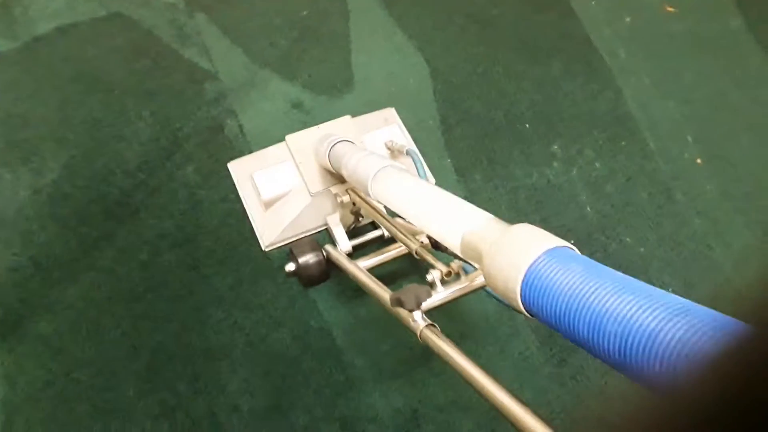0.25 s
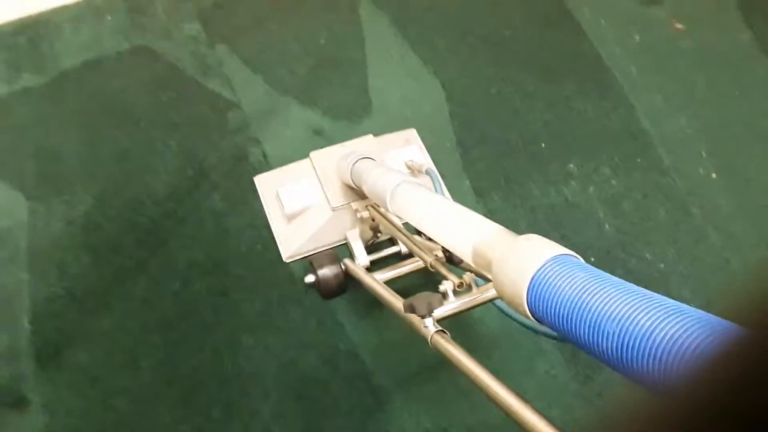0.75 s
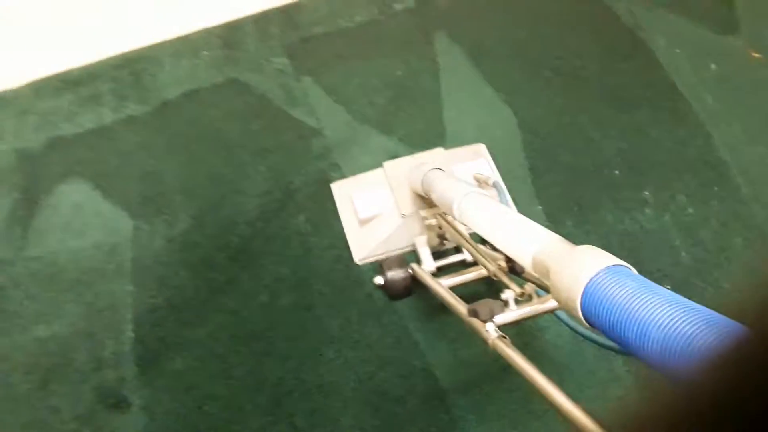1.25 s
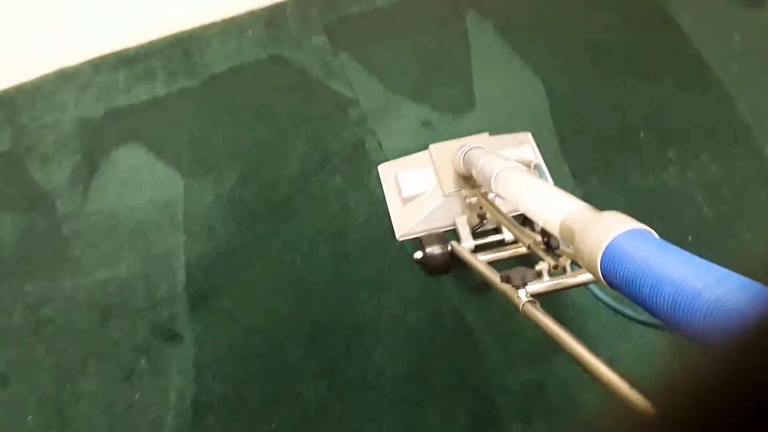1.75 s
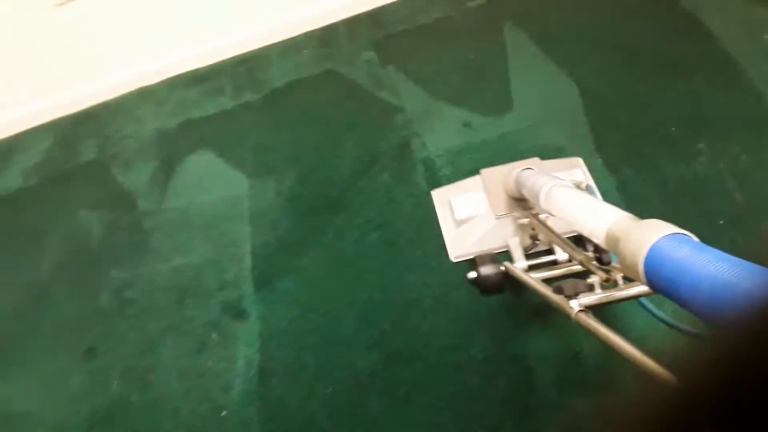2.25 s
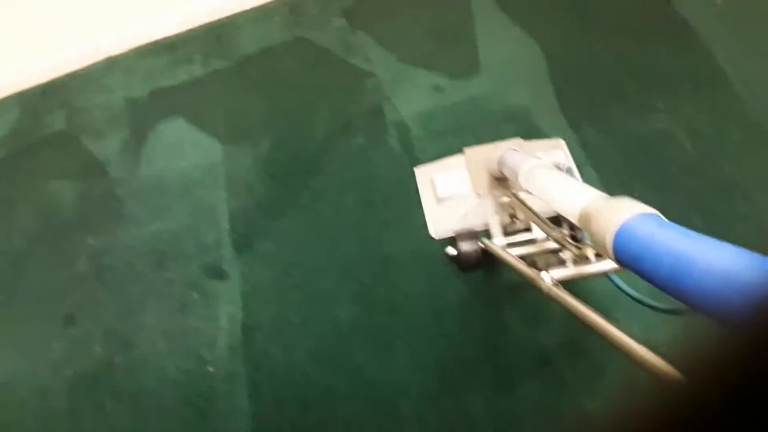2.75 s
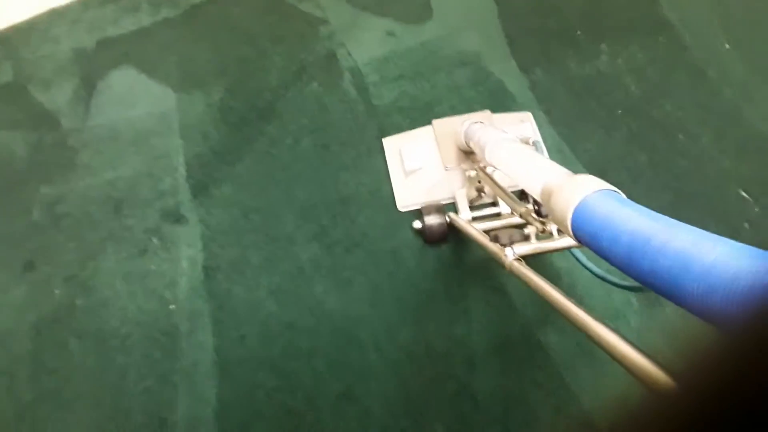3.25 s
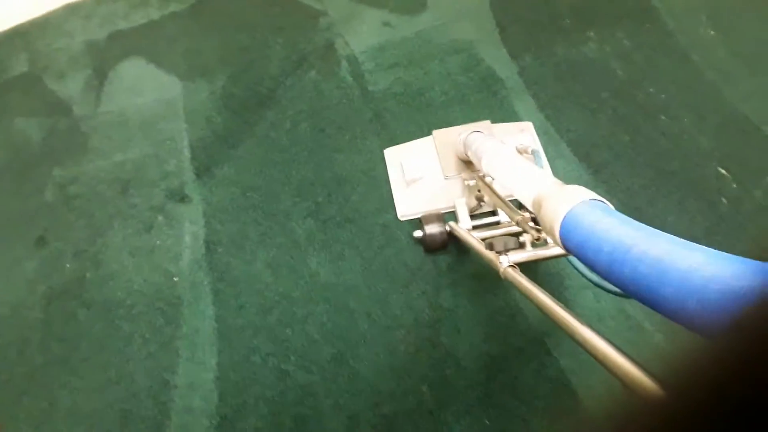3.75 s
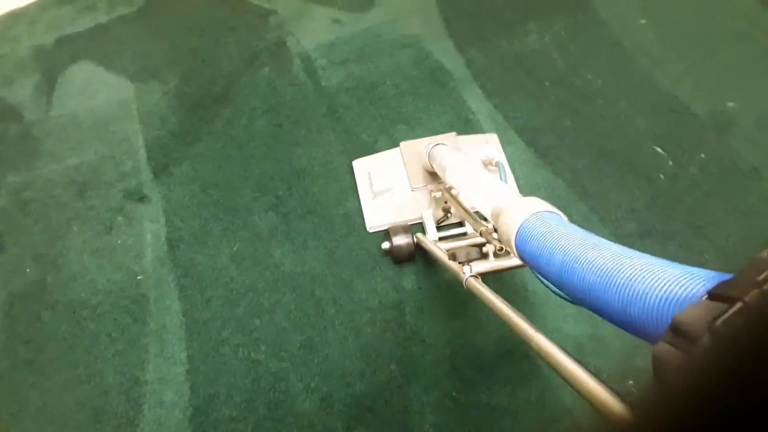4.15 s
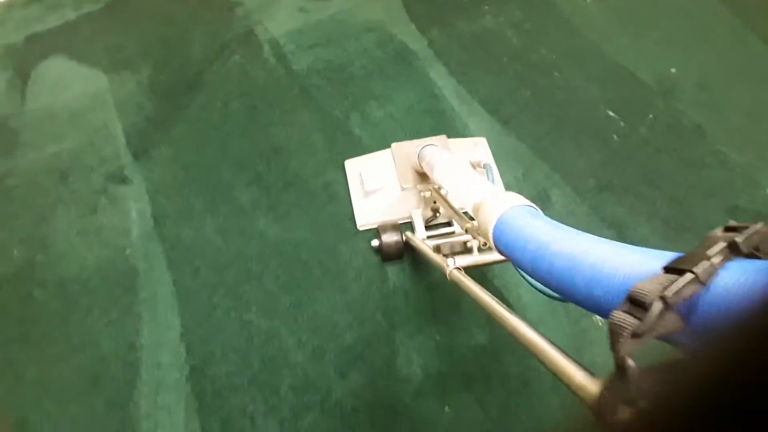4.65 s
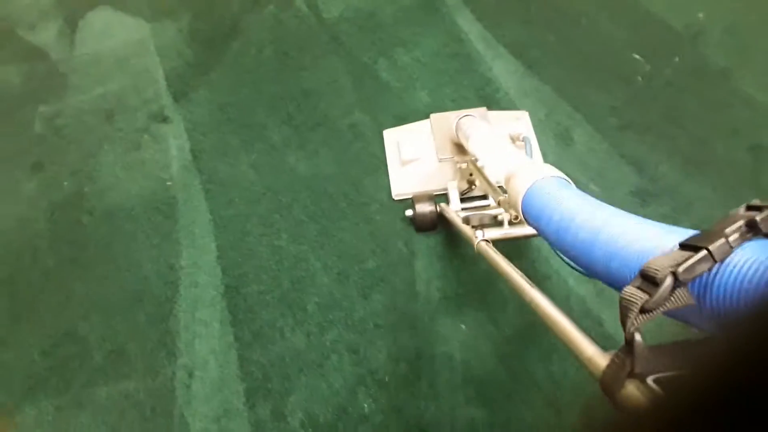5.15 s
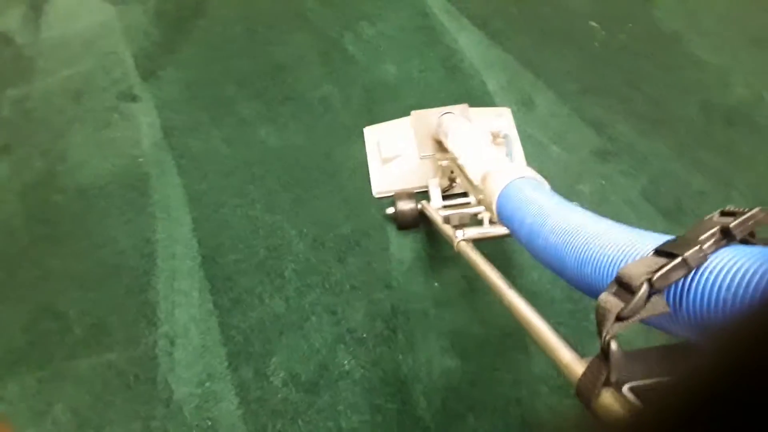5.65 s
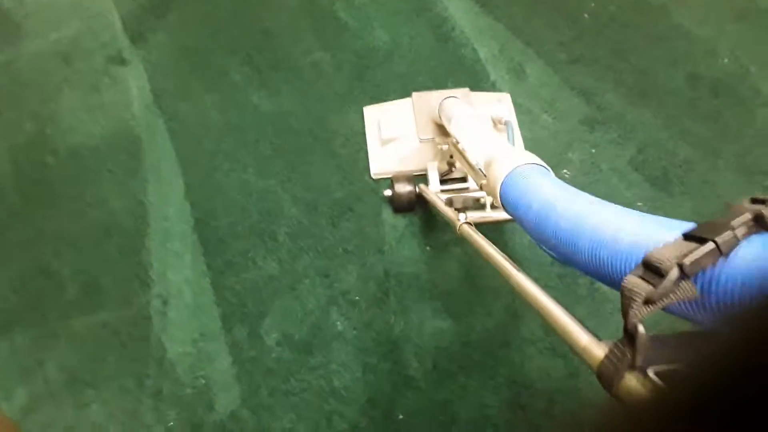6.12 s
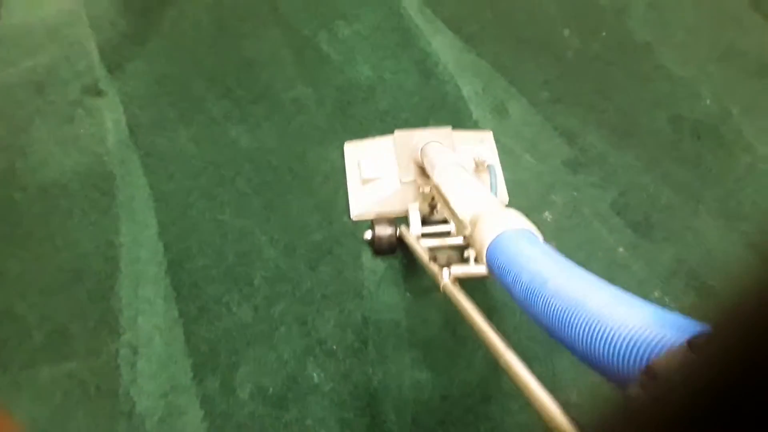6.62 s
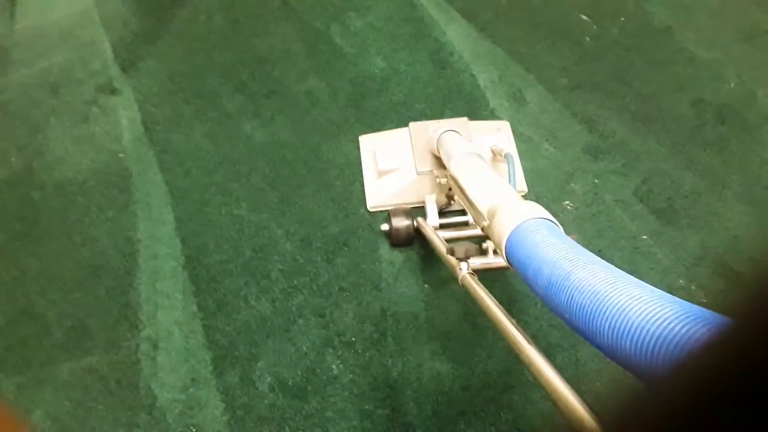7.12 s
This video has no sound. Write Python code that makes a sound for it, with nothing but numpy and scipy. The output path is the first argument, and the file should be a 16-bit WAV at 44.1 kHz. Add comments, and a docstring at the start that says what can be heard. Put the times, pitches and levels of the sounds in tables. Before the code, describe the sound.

A wand head pulls air and water from wet carpet indoors, about a metre from a phone-like microphone. From 0 s a loud, bright, nearly steady hiss fills the sound, its narrow high band fluttering, with fine sizzling spray on top. It strengthens to about 1 s, then the lip opens and more hollow, mid-high airy ringing joins. Near 2 s the hiss eases while a slug of water briefly swells the rush in the neck and hose. From 2.5 to 5.5 s the suction stays even, slowly softening, with tiny puffs and slight sizzling patches; a weaker slug passes near 4.5 s. Around 6 s the head seals tighter: the body of the rush thins, leaving high hiss, with regular soft pulses from 6.3 to 7.2 s. Throughout, low hose drones come and go and a faint machine hum wavers over quiet rumble. It is still running at the end, about 7.4 s.

```python
"""Indoors, a carpet extraction wand is drawn over wet carpet, about a metre away.
Air rushes into the head and rings its cavity; the narrow slot sings near 8 kHz and wet pile makes it flutter.
Spray sizzles at the lip, and slowly shifting reflections colour the hiss.
The hose rushes and drones, and the suction machine hums further off over a low rumble.
Filtered noise makes the air and water sounds; sine waves make the machine's hum."""
import sys
import numpy as np
from scipy import signal
from scipy.fft import rfft, irfft
from scipy.io import wavfile
from scipy.ndimage import map_coordinates

SR = 44100
rng = np.random.default_rng(int(sys.argv[2]) if len(sys.argv) > 2 else 0)


def log_audio(samples):
    """Write samples as a 16-bit WAV file to the path given in sys.argv[1]."""
    # one column per channel
    frames = np.atleast_2d(samples).T
    # limit to full scale, then quantise
    limited = np.clip(frames, -1, 1)
    pcm = np.round(limited * 32767).astype(np.int16)
    wavfile.write(sys.argv[1], SR, pcm)


N = 325557

# Slugs of water that tumble through the neck and the hose.
# Each row: centre in seconds, spread in seconds, rise in dB.
SLUGS = [(2.0, 0.14, 2.4), (4.45, .25, .8)]

# How each part of the airflow answers; a tight seal thins the rush and leaves a high hiss.
# Each named row: level in dB, dB per step of suction, dB with the lip fully open, dB when sealed,
# dB per brief lift of strength 1.
AIRFLOW = { "slot": (-22, 1.19, -0.5, 1.2, 1.5), "spray": (-30, 0.82, -3, -1, 1.5),
           "edge": (-38, 1.97, -2.5, 7.5, -1), "pile": (-26.5, 0.43, 4, -.1, 0.2),
           "head": (-35, 1.27, 5.5, -2.9, 4), "neck": (-36.5, 0.84, 2, -5, 1),
           "hose": (-33, 0.31, -2.96, -5.5, -0.2), }


def undb(db):
    """Turn decibels into a gain."""
    return 10 ** (np.asarray(db) / 20)


def unit(x):
    """Scale a signal to an rms (average strength) of 1."""
    return x / np.sqrt(np.mean(x ** 2))


def curves(table):
    """Join the points of a table with straight lines: one curve per column after the time in seconds."""
    times, *columns = np.transpose(table)
    return [np.interp(np.arange(N) / SR, times, column) for column in columns]


def swell(at_s, width_s):
    """A bell-shaped rise and fall of height 1."""
    return np.exp(-.5 * ((np.arange(N) / SR - at_s) / width_s) ** 2)


def swells(table):
    """Add up bells from rows of centre in seconds, spread in seconds, height."""
    return sum(height * swell(at_s, width_s) for at_s, width_s, height in table)


def walk(rate):
    """Smooth random wander of rms 1, with motion faster than about rate in Hz held back."""
    f = np.fft.rfftfreq(N, 1 / SR)
    smoothed = rfft(rng.standard_normal(N)) / (1 + (f / rate) ** 2)
    return unit(irfft(smoothed, N))


def turbulence(points):
    """Tumbling air or water: noise of rms 1 shaped by a broad spectrum of Hz and relative dB."""
    f = np.fft.rfftfreq(N, 1 / SR)
    hz, db = np.transpose(points)
    colour = undb(np.interp(np.log(f + 1), np.log(hz), db))
    return unit(irfft(rfft(rng.standard_normal(N)) * colour, N))


def resonances(modes, skirt):
    """Ringing air, each resonance blown by its own eddies and fading a few widths (skirt) from its centre."""
    f = np.fft.rfftfreq(N, 1 / SR)
    spectrum = 0
    for hz, width, db in modes:
        detune = (f - hz) / width
        response = undb(db) / (1 + 2j * detune) / (1 + (detune / skirt) ** 2)
        spectrum = spectrum + response * rfft(rng.standard_normal(N))
    return unit(irfft(spectrum, N))


def building_rumble():
    """Low noise from the machine through the building, its level wandering slowly."""
    # Broad colour of the rumble. Each row: frequency in Hz, relative level in dB.
    rumble_spectrum = [(20, -21), (60, -13), (80, -9), (100, -1), (140, -4), (220, -12), (500, -10),
                       (2000, -42)]
    return turbulence(rumble_spectrum) * undb(-53 + 1.0 * walk(3.3))


def machine():
    """A nearly steady shaft turns the blower; its lines waver a little on the way through the building."""
    # Low hum lines. Each row: multiple of the shaft rate, relative level in dB.
    hum_orders = [(2, -28), (3, -16.5), (4, -9), (5, 2.5), (6, -1.5)]
    # The low hum swells and fades along the room's standing waves. Each row: time in seconds, level in dB.
    hum_level = [(0, -50), (0.5, -50), (1.2, -54), (1.85, -46), (2.3, -51), (2.7, -46.5), (4.75, -46.5),
                 (5.2, -52.5), (6.05, -52.5), (7.38, -50)]
    # Dips of the top line near the nodes (quiet spots) of its standing wave.
    # Each row: centre in seconds, spread in seconds, change in dB.
    top_line_nodes = [(.95, 0.35, -19), (5.75, 0.15, -5)]
    shaft_hz, top_line_db = 24.5, -51
    turns = np.cumsum(shaft_hz * (1 + 0.0025 * walk(2.1))) / SR

    def line(order):
        """One sine at a multiple of the shaft rate, with a wandering level."""
        return undb(1.2 * walk(2.8)) * np.sin(2 * np.pi * (order * turns + rng.random()))

    low = sum(undb(db) * line(order=round(k)) for k, db in hum_orders)
    low_hum = unit(low) * undb(curves(hum_level)[0])
    top_line = unit(line(order=8)) * undb(top_line_db + swells(top_line_nodes) + 1.2 * walk(5))
    return low_hum + top_line


def drone():
    """Low air resonances of the hose come and go as it bends."""
    # Air resonances of the hose, used one at a time at equal strength, so the last column changes nothing.
    # Each row: frequency in Hz, width in Hz before the skirt narrows it, level in dB.
    hose_modes = [(180, 18, -3.5), (235, 41, 0), (319, 38, 0)]
    # A bend lets one resonance speak.
    # Each row: centre in seconds, spread in seconds, which resonance (counted from 0), peak level in dB.
    bends = [(.1, .55, 1, -47), (1.72, 0.15, 2, -46), (1.9, 0.45, 1, -53), (3.9, 1.45, 0, -50.5),
             (4.9, 1.18, 2, -48), (5.3, 0.25, 1, -53)]
    total = 0
    for at_s, width_s, which, db in bends:
        tone = resonances([hose_modes[round(which)]], skirt=1.4)
        total = total + tone * undb(db) * swell(at_s, width_s)
    return total


def hose(rush_db):
    """Air and water tumble down the ribbed hose as broad noise, louder when a slug passes."""
    # Broad colour of the rush. Each row: frequency in Hz, relative level in dB.
    hose_spectrum = [(60, -37), (95, -14), (150, -11.5), (230, -3), (300, -4.5), (390, -3), (540, .5),
                     (800, 0.5), (1050, 2), (1500, -5), (3000, -4), (8000, -41)]
    return turbulence(hose_spectrum) * undb(rush_db + swells(SLUGS) + 0.35 * walk(9))


def room(x, echo_db, sway_s, near_s, far_s, count=14):
    """Floor, wall and operator reflect the sound; the delays sway slowly as the wand moves."""
    i = np.arange(N)
    out = x
    for lag in np.geomspace(near_s, far_s, count):
        stretch, start = rng.random(2)
        sway = sway_s * np.sin(2 * np.pi * (0.0786 * i / SR + start))
        delay = lag * (.9 + .2 * stretch) + sway
        echo = map_coordinates(x, [i - delay * SR], order=3, mode="mirror")
        # either sign, so each echo may add to the sound or cancel some of it
        out = out + undb(echo_db) * rng.choice([-1, 1]) * echo
    # keep the overall level about the same
    return out / np.sqrt(1 + count * undb(echo_db) ** 2)


def airflow_levels():
    """Level in dB of each part of the airflow, from suction, lip opening, seal and brief lifts."""
    # Strength of the suction. Each row: time in seconds, strength in steps.
    suction = [(0, 3.5), (0.7, 4.5), (0.98, 4.5), (1.22, 4.0), (1.7, 4), (1.87, 2.5), (2.4, 2.0),
               (2.95, 1.3), (5.3, 0.5), (7.38, 0.15)]
    # How far the lip rides up off the carpet. Each row: time in seconds, opening from 0 to 1.
    lip_gap = [(0, 0.17), (0.45, 0.1), (0.78, 0), (0.9, 0.2), (1.25, 0.8), (1.8, 0.3), (2.1, 0.93),
               (2.8, 0.66), (4.3, 0.59), (5.65, 0.62), (6.4, 0.47), (7.38, 0.5)]
    # Brief lifts in the airflow, loudest in the head's ringing; the last four form a regular judder.
    # Each row: time in seconds, strength.
    brief_lifts = [(.05, .6), (1.6, .7), (2.42, 0.54), (2.81, .5), (3.12, 0.86), (3.89, .5), (4.34, 0.59),
                   (5.46, .6), (6.27, 0.92), (6.57, 1.4), (6.87, 1.2), (7.17, 0.64)]
    lift_width_s = 0.04
    # late in the stroke the lip beds down into a tight seal
    seal_at_s, seal_takes_s = 5.83, 0.45

    flow, gap = curves(suction)[0], curves(lip_gap)[0]
    sealed = np.clip((np.arange(N) / SR - seal_at_s) / seal_takes_s, 0, 1)
    lift = sum(strength * swell(at_s, lift_width_s) for at_s, strength in brief_lifts)
    levels = {}
    for part, (db, per_flow, open_db, sealed_db, lift_db) in AIRFLOW.items():
        levels[part] = db + per_flow * flow + open_db * gap + sealed_db * sealed + lift_db * lift
    return levels


def wand(db):
    """Air drawn through the pile, the slot, the head and the neck makes hiss and ringing noise."""
    # Air resonances of the slot, its edge, the head and the neck.
    # Each row: frequency in Hz, width in Hz before the skirt narrows it, relative level in dB.
    slot_modes = [(8410, 925, 0)]
    edge_modes = [(12600, 2300, 0)]
    head_modes = [(2702, 530, 2), (2460, 470, -3.5), (3400, 660, -5.5)]
    neck_modes = [(1436, 200, -0.92), (1890, 350, -1.3)]
    # Broad colours of the spray and of the air in the pile. Each row: frequency in Hz, relative level in dB.
    spray_spectrum = [(4000, -36), (8500, -1.5), (10000, 0.5), (11200, 0.5), (12200, -3.5), (13200, -14),
                      (16000, -23)]
    pile_spectrum = [(300, -30.5), (1500, -4.5), (3200, -1), (4500, 0.5), (6000, 1), (7300, 4), (9300, 1.5),
                     (10500, -10), (13000, -25), (14500, -3), (16000, -9)]
    # Wetter patches that throw up more spray. Each row: centre in seconds, spread in seconds, rise in dB.
    wet_patches = [(.42, .12, 2), (3.15, .1, 2), (4.2, .17, 1.3)]

    wet_db = swells(wet_patches)
    # tufts and water keep narrowing the slot, so its note flutters in level
    slot = resonances(slot_modes, skirt=1.87) * undb(db["slot"] + .42 * walk(20))
    spray = turbulence(spray_spectrum) * undb(db["spray"] + wet_db + .5 * walk(150))
    edge = resonances(edge_modes, skirt=1.5) * undb(db["edge"] + wet_db + 0.76 * walk(25))
    pile = turbulence(pile_spectrum) * undb(db["pile"] + 0.64 * walk(15))
    head = resonances(head_modes, skirt=3.7) * undb(db["head"] + 1.0 * walk(12))
    neck = resonances(neck_modes, skirt=3.1) * undb(db["neck"] + swells(SLUGS) + 0.72 * walk(11))
    return slot + spray + edge + pile + head + neck


def scene():
    """Rumble, machine, hose and wand together, the same in both ears."""
    db = airflow_levels()
    rush = room(hose(db["hose"]), echo_db=-18, sway_s=0.00082, near_s=.018, far_s=.06, count=6)
    hiss = room(wand(db), echo_db=-23.0, sway_s=0.000309, near_s=.006, far_s=.04, count=16)
    mono = building_rumble() + machine() + drone() + rush + hiss
    return np.array([mono, mono])


def record(dry):
    """A phone picks up the sound and cuts the top steeply, above 15.7 kHz."""
    top_hz = 15700
    low_pass = signal.ellip(12, .1, 80, top_hz, fs=SR, output="sos")
    return signal.sosfilt(low_pass, dry)


dry = scene()
out = record(dry)
log_audio(out)
```